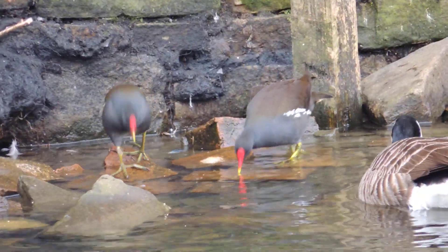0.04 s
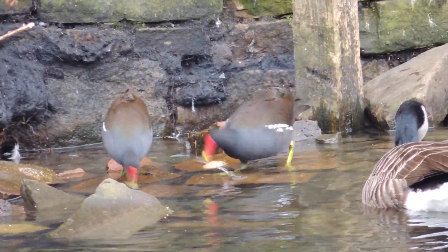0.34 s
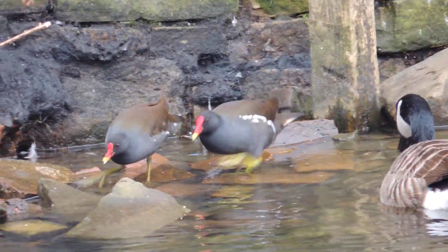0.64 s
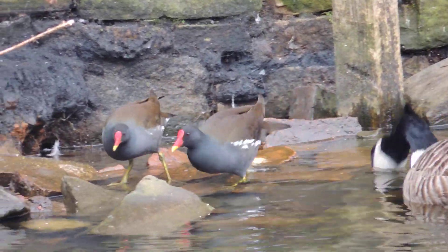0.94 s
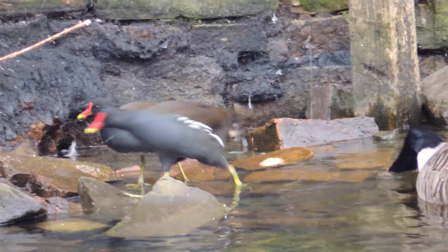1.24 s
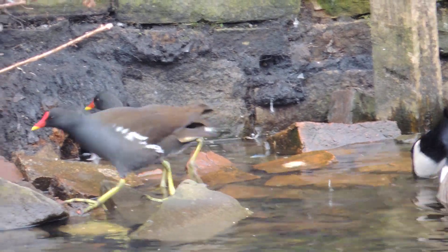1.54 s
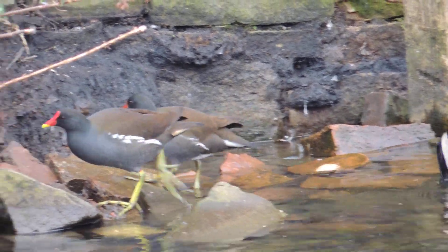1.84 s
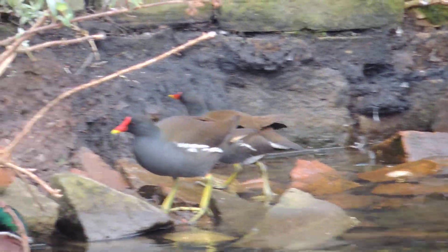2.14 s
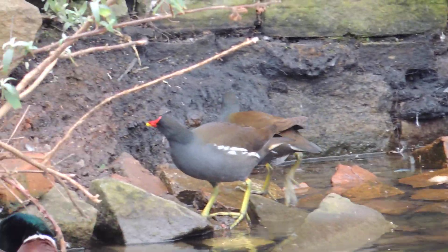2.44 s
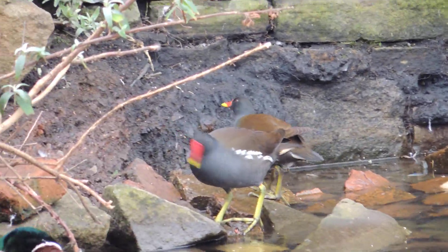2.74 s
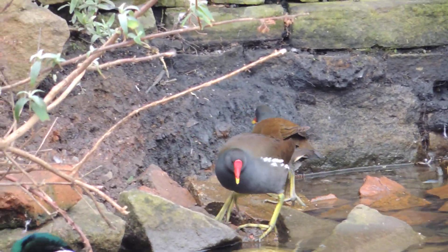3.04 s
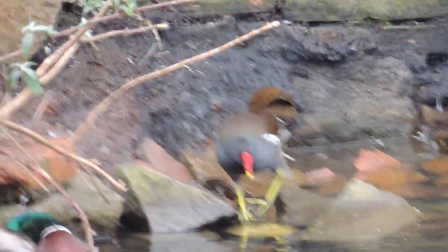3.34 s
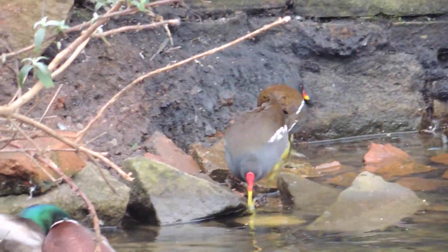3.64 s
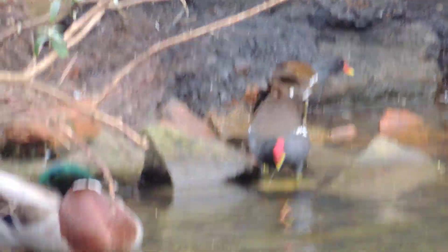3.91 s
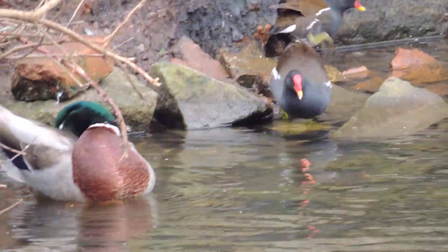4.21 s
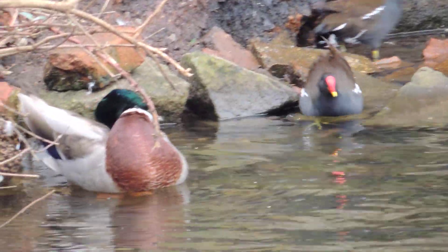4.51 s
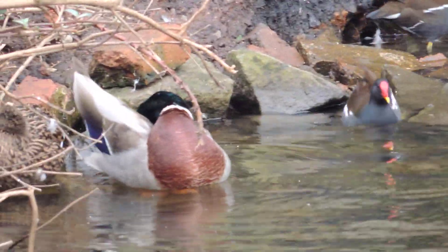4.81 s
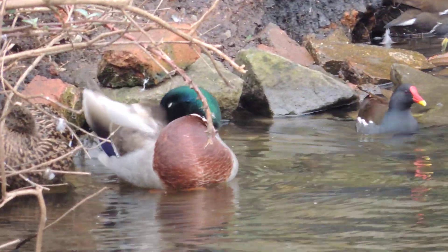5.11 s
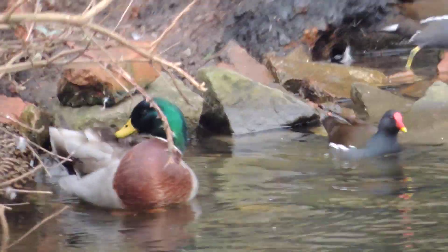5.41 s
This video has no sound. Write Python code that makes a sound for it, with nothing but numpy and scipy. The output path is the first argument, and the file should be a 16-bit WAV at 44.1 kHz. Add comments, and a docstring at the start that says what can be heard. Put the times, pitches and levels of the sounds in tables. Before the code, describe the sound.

A steady rush of water, slightly to the left, runs through the whole five and a half seconds outdoors. Wind rumbles on the microphone, mostly on the right, with low thumping buffets that crowd the first second and peak at about 0.85 seconds. Lighter gusts return between 2.2 and 2.8 seconds and from 3.7 onward. A faint, distant engine drones low underneath and fades after 2 seconds. Birds wading in the shallows make small drips, ticks and soft swishes throughout, with clearer plips near 0.5, 1.7, 3, 4.2 and 5.2 seconds, and very faint puffs of hiss around 4 seconds. A small bird nearby, slightly left, gives scattered, very high, tiny chips, the loudest at about 2.9 seconds. From 4.6 to 5.4 seconds a farther bird whistles thin, faintly echoing notes, three high ones followed by three lower ones.

```python
"""Wading birds by a canal bank

Water rushes steadily off to the left, the sum of countless ringing bubbles, and a far engine drones.
Wind rumbles and buffets as its eddies pass the microphone ports, mostly the right one. A small bird
nearby gives very high chips; towards the end a farther one whistles thin notes. In the shallows, feet
and bills set small cavities ringing, among soft swishes and a few very faint puffs of hiss."""
import sys
import numpy as np
from scipy import signal
from scipy.fft import rfft, irfft
from scipy.io import wavfile

SR = 44100
rng = np.random.default_rng(int(sys.argv[2]) if len(sys.argv) > 2 else 0)


def wav_record(signal):
    """Record a signal, one row per channel, as 16-bit PCM in the file named by sys.argv[1]."""
    frames = np.transpose(np.atleast_2d(signal))
    bounded = np.clip(frames, -1, 1)
    # unit amplitude maps onto the largest positive 16-bit level
    quanta = np.round(bounded * 32767).astype(np.int16)
    wavfile.write(sys.argv[1], SR, quanta)


N = 249606
TIME = np.arange(N) / SR
FREQS = np.maximum(np.fft.rfftfreq(N, 1 / SR), 1)


def from_db(db):
    """Amplitude ratio of a level: a factor of ten for every 20 dB."""
    return 10 ** (np.asarray(db) / 20)


def rms_one(x):
    """Normalisation to unit mean power."""
    return x / np.sqrt(np.mean(x ** 2) + 1e-20)


def gain_of(points):
    """Frequency response through points (f/Hz, level/dB), interpolated in log frequency."""
    hz, db = np.transpose(points)
    return from_db(np.interp(np.log(FREQS), np.log(hz), db))


def colour(x, gain):
    """Linear filtering: the spectrum is multiplied by a frequency response."""
    return irfft(rfft(x) * gain, N)


def noise(points, channels=1):
    """Incoherent Gaussian noises with a spectrum given as (f/Hz, spectral density level/dB)."""
    return colour(rng.standard_normal((channels, N)) * np.sqrt(SR / 2), gain_of(points))


def drift(corner_hz, channels=1):
    """Random fluctuation: low-pass noise of rms 1."""
    return rms_one(colour(rng.standard_normal((channels, N)), 1 / (1 + (FREQS / corner_hz) ** 2)))


def ring(x, hz, t60):
    """Damped resonator: a unit impulse starts a unit sine that falls 60 dB in t60 seconds."""
    r, w = from_db(-60 / (t60 * SR)), 2 * np.pi * hz / SR
    return signal.lfilter([0, np.sin(w)], [1, -2 * r * np.cos(w), r * r], x + 1e-18)


def add(out, s, sound, pan_db):
    """Superposition at time s; pan_db is left minus right, made by attenuating the weaker side."""
    start = round(s * SR)
    first, last = max(start, 0), min(start + len(sound), N)
    sides = from_db([[min(pan_db, 0)], [min(-pan_db, 0)]])
    out[:, first:last] += sides * sound[first - start:last - start]


def from_left(x, lag_ms):
    """Path difference: sound from the left reaches the right port later."""
    return np.array([x[0], colour(x[1], np.exp(-2j * np.pi * FREQS * lag_ms / 1000))])


def among_banks(x, t60, wet_db, delay_s):
    """Reverberation: walls and branches scatter sound into an exponential tail, different on each side."""
    t = TIME[:SR]
    tail = rng.standard_normal((2, SR)) * from_db(-60 * t / t60) * (t > delay_s)
    tail /= np.sqrt(np.sum(tail ** 2, axis=1, keepdims=True))
    return x + from_db(wet_db) * signal.fftconvolve(x, tail, axes=1)[:, :N]


def engine(level_db=-41.5, fades_at_s=2.1, fade_db_per_s=3.5, flutter_db=3, waver=0.022):
    """Long-range propagation: only the firing tone carries this far, and moving air makes it flutter."""
    # firing rate: t/s, f/Hz
    firing = [(0, 83.3), (.8, 76.14), (1.4, 84.75), (1.8, 60.9), (2.1, 60.64), (2.6, 66.55), (3.55, 66.1),
              (3.85, 45.9)]
    firing_hz = np.interp(TIME, *np.transpose(firing)) * (1 + waver * drift(5.9)[0])
    db = level_db - fade_db_per_s * np.maximum(TIME - fades_at_s, 0)
    return from_db(db + flutter_db * drift(30)[0]) * np.sin(2 * np.pi * np.cumsum(firing_hz) / SR)


def pings(samples, pitches, per_s, cycles, spread_db, max_spreads):
    """Free decay: random impulses ring down 60 dB in the given cycles; one signal for each pitch."""
    excess_db = spread_db * np.minimum(rng.exponential(1, samples), max_spreads)
    strengths = from_db(excess_db) * rng.choice([-1, 1], samples)
    born = rng.random(samples) < per_s / SR
    pitch_index = rng.integers(0, len(pitches), samples)
    return np.array([ring(strengths * born * (pitch_index == k), hz, cycles / hz)
                     for k, hz in enumerate(pitches)])


def rushing_water(bubble_db=-47, surge_db=0.97):
    """Incoherent summation: countless far bubbles merge into noise; nearer ones stand out a little."""
    # spectrum of the rush: f/Hz, spectral density level/dB
    spectrum = [(60, -65), (280, -66.5), (500, -70.5), (680, -68), (1000, -69.5), (1400, -69), (1900, -70),
                (2250, -73.7), (2800, -74.2), (3900, -80), (6000, -77.2), (7900, -77.5), (10300, -82.5),
                (12400, -82.5), (14200, -86.5)]
    # share of the hiss that differs between left and right, with narrow dips near 3.5 and 4.75 kHz:
    # f/Hz, level/dB re the whole (capped at 0 dB)
    unshared = [(100, -5), (300, -19.5), (600, -13.5), (1000, -6), (1350, -15.5), (2050, -4), (2800, -3),
                (3500, -23.5), (4100, 2), (4750, -20), (5400, -5), (6500, -4.5), (8000, -6), (10000, -1.5),
                (11200, -4), (14000, -4)]
    # diffraction round the housing puts the left port ahead: f/Hz, phase lead/rad
    port_lead = [(0, 0), (1890, 1.7854), (2500, 3), (3700, 3), (5000, 3.5), (5400, 5), (5860, 4), (6630, 7),
                 (7240, 6.5), (8530, 7.5), (11900, 8), (12500, 10.5), (14300, 10.5)]
    unshared_gain = np.minimum(gain_of(unshared), 1)
    common = colour(noise(spectrum)[0], np.sqrt(1 - unshared_gain ** 2))
    surge = from_db(surge_db * drift(28)[0])
    pitches = np.geomspace(450, 5000, 24)
    bubbles = pings(N, pitches, per_s=260, cycles=6.5, spread_db=1.5, max_spreads=5)
    nearer = rms_one(pitches ** -.25 @ bubbles)  # higher bubbles are weaker
    left = common * surge + from_db(bubble_db) * nearer
    right = colour(left, np.exp(-1j * np.interp(FREQS, *np.transpose(port_lead))))
    return np.array([left, right]) + colour(noise(spectrum, channels=2), unshared_gain)


def port_colour(x):
    """Frequency response of the two ports: each takes half of the level difference between them."""
    # left port relative to right: f/Hz, level/dB
    imbalance = [(250, -1), (700, -2), (2000, -1.7), (2900, 1), (5600, -1.5), (6300, 0), (6950, 1),
                 (8100, 4.5), (8800, 4.5), (10100, 9), (12500, 4.5), (13700, 4.5)]
    return colour(x, gain_of(imbalance) ** np.array([[.5], [-.5]]))


def waver_treble(x, corner_hz=5000):
    """Amplitude modulation of the upper band: the hiss slowly swells and sinks."""
    # gain of the treble: t/s, level/dB
    treble_level = [(0, -0.5), (.3, -2), (.6, -0.14), (1.3, 0.5), (1.7, -0.1), (2.2, .1), (3.5, 0.5),
                    (3.7, -0.62), (5.6, -0.39)]
    treble = colour(x, FREQS ** 2 / (FREQS ** 2 + corner_hz ** 2))
    return x + treble * (from_db(np.interp(TIME, *np.transpose(treble_level))) - 1)


def gusting():
    """Unsteady flow: the wind's level in dB above the breeze, as each gust swells, holds and drops."""
    # gusts: centre t/s, duration/s, level/dB re the breeze
    gusts = [(.12, 0.36, 8), (.42, 0.22, 7.5), (0.623, 0.17, 9.5), (0.94, .36, 7), (1.387, 0.21, 4),
             (2.225, 0.24, 6), (2.44, 0.28, 6), (2.621, 0.097, 5), (3.708, 0.18, 5.5), (3.914, 0.3, 5),
             (4.317, 0.18, 5.5), (4.524, 0.34, 4), (5.053, .24, 4), (5.5, 0.14, 3.5)]
    return sum(db * np.exp(-((TIME - s) / (length / 2)) ** 4) for s, length, db in gusts)


def wind(left_db=-44.5, right_db=-36.5, left_gust_share=0.93, lumps_db=2):
    """Turbulent pressure: each port has its own rumble under the same gusts; the left is sheltered."""
    # spectrum of the turbulence: f/Hz, relative spectral density level/dB
    rumble = [(12, -4), (25, 2), (45, 5), (80, 1.5), (130, -4.5), (220, -15.5), (400, -13), (900, -92)]
    gust_db = gusting()
    port_db = np.array([left_db + left_gust_share * gust_db, right_db + gust_db])
    port_db += lumps_db * drift(5.8, channels=2)
    return rms_one(noise(rumble, channels=2)) * from_db(port_db)


def eddies(per_s=4.5, peak_db=-30, spread_db=0.5, breeze_hz=69.6, octaves_per_db=.1, candidates=120):
    """Convection: faster air brings random lesser eddies more often, stronger and higher in pitch."""
    gust_db, duration, rows = gusting(), N / SR, []
    left_share, shadow_db = .2, 27  # an eddy hits one port and leaks faintly to the other
    for (when, chance, side), size in zip(rng.random((candidates, 3)), rng.standard_normal(candidates)):
        gust = gust_db[int(when * N)]
        if chance < per_s * from_db(gust) * duration / candidates:
            hz = breeze_hz * 2 ** (octaves_per_db * gust)
            pan_db = shadow_db if side < left_share else -shadow_db
            rows.append((when * duration, peak_db + gust - spread_db * size, hz, pan_db))
    return rows


def buffets(wake_db=-18, wake_s=0.017):
    """Vortex passage: a brief suction between two pressure lobes, wrapped in a turbulent wake."""
    # the hardest eddies: t/s, peak level/dB, f/Hz, left minus right/dB
    hard_eddies = [(.028, -18.5, 175, 22), (.075, -14, 174, -25), (.122, -16, 248, -18),
                   (.135, -11.5, 130, -20), (.164, -13, 115, -20), (.208, -16.5, 100, -25),
                   (0.284, -13.5, 226, -23), (.313, -18, 186, 7), (0.353, -21, 218, -6),
                   (.375, -13, 209, -20), (.392, -13, 135, -23), (.409, -21, 133, 12),
                   (0.495, -18, 173, -20), (.521, -18.5, 175, -24), (0.576, -23, 85, -18),
                   (0.612, -17.5, 85, -20), (.684, -11.5, 153, -26), (.707, -15.5, 125, -23),
                   (.782, -21.5, 149, -20), (.81, -19, 270, -22), (.85, -7.5, 165, -23),
                   (.865, -13.5, 80, -18), (0.878, -12, 100, -20), (.995, -19.5, 135, -23.5),
                   (1.115, -23, 54.7, -20), (1.372, -20, 210, -12), (1.392, -21, 110, -19),
                   (1.889, -22, 68, -22), (2.16, -15, 109, -26), (2.178, -22, 88, -22),
                   (2.458, -22.5, 89, -20), (2.622, -22, 80, -20), (2.801, -17, 172, -18),
                   (3.675, -24, 132, -20), (3.692, -19, 44.7, -25), (3.901, -20, 100, -23),
                   (3.977, -18.5, 70, -27), (4.098, -21, 124, -24), (4.237, -22, 100, -20),
                   (4.27, -17, 114, -24), (4.308, -23, 133, -20), (4.568, -21, 133, -22),
                   (5.08, -16, 80.4, -25)]
    out, t = np.zeros((2, N)), np.arange(-SR // 20, SR // 20) / SR
    for s, db, hz, pan_db in hard_eddies + eddies():
        distance_squared = (np.pi * hz * t) ** 2
        pulse = (2 * distance_squared - 1) * np.exp(-distance_squared)
        band = signal.butter(2, [hz / 2, hz * np.sqrt(2)], "band", fs=SR, output="sos")
        turbulence = rms_one(signal.sosfilt(band, rng.standard_normal(len(t))))
        wake = turbulence * np.exp(-.5 * (t / wake_s) ** 2)
        add(out, s + t[0], from_db(db) * (pulse + from_db(wake_db) * wake), pan_db)
    return out


def bird(notes, waver, waver_hz, skew, trill_hz, trill_db):
    """Frequency and amplitude modulation: each note is a gliding, trilled sine; skew > 1 peaks late."""
    out, unsteady = np.zeros((2, N)), drift(waver_hz)[0]
    for s, length, pitch_hz, db, fall, pan_db in notes:
        progress = np.linspace(0, 1, max(round(length * SR), 20))
        rasp = waver * np.interp(s + progress * length, TIME, unsteady)
        hz = pitch_hz * (1 + fall * (.5 - progress) + rasp)
        swell = np.sqrt(np.abs(np.sin(np.pi * progress ** skew)))
        dips_db = trill_db * np.cos(np.pi * trill_hz * progress * length) ** 2
        add(out, s, from_db(db - dips_db) * swell * np.sin(2 * np.pi * np.cumsum(hz) / SR), pan_db)
    return out


def far_bird():
    """Nearly pure tones: slight modulation leaves the whistles thin and narrow in band."""
    # whistles: t/s, duration/s, f/Hz, level/dB before the trill, fall/share of f, left minus right/dB
    whistles = [(4.625, 0.051, 7190, -37, -0.0033, -15), (4.675, .07, 7225, -34, -0.0026, -15),
                (4.75, .07, 7160, -42, 0.0032, -10), (5.042, .06, 4010, -35.5, 0.021, -13),
                (5.145, 0.066, 3100, -40, -0.028, 4), (5.27, 0.092, 3080, -40, 0.022, 6)]
    return bird(whistles, waver=0.0028, waver_hz=120, skew=0.53, trill_hz=22.1, trill_db=4)


def near_bird():
    """Spectral broadening: short duration and fast pitch jitter turn high tones into chips."""
    # chips: t/s, duration/s, f/Hz, level/dB before the trill, fall/share of f, left minus right/dB
    chips = [(.482, .008, 9600, -33, .06, 6), (.81, .007, 11400, -29, .02, 8),
             (1.509, .0083, 11600, -25, .03, 8), (2.123, 0.019, 9750, -30, 0.041, 8),
             (2.563, 0.013, 9430, -27, .02, 6), (2.874, 0.016, 9520, -13.5, .04, 9),
             (3.254, 0.0084, 9300, -22, 0.082, 5), (3.561, 0.04, 9400, -29, 0.048, 15),
             (3.603, .009, 9600, -24, .02, 10), (3.61, .007, 10900, -29, .02, 6),
             (4.262, 0.016, 10000, -30, .02, 8), (4.295, .018, 9450, -33, .02, 8),
             (4.316, .006, 9900, -29, -.15, 8), (4.677, .0053, 9550, -27, .03, 8)]
    return bird(chips, waver=0.033, waver_hz=2400, skew=1.7, trill_hz=114, trill_db=12)


def swishes(octaves=0.2):
    """Overlapping resonances: a dense cloud of tiny pings merges into a hiss that swells and ebbs."""
    # swishes; those at 3.855, 4.05 and 4.417 s are very faint brief puffs of hiss near 3.6 kHz:
    # centre t/s, duration/s, level/dB, centre f/Hz, left minus right/dB
    puffs = [(0.593, 0.033, -44.5, 4200, -7), (.668, 0.033, -45, 4200, -1), (.95, 0.045, -49, 4480, 4),
             (1.05, .03, -45, 3900, -4.5), (1.611, 0.058, -42.5, 3460, -9), (1.74, .1, -45.5, 4200, -8),
             (1.968, 0.36, -51, 4540, -5), (2.3, .08, -52, 3380, 4), (2.95, .05, -49, 3600, 2),
             (3.131, .09, -47, 3500, 3), (3.315, 0.076, -45, 3570, 2), (3.855, 0.033, -50, 3716, 1),
             (4.05, .04, -49.5, 3510, 3), (4.417, .04, -50, 3600, 0), (5.149, 0.046, -45, 4700, 7)]
    out, t = np.zeros((2, N)), np.arange(-SR // 4, SR // 4) / SR
    for s, length, db, hz, pan_db in puffs:
        pitches = hz * 2 ** (octaves * np.linspace(-1, 1, 9))
        ringing = pings(len(t), pitches, per_s=600, cycles=13, spread_db=3, max_spreads=4)
        swell = np.exp(-(2 * t / length) ** 2)
        add(out, s + t[0], from_db(db) * rms_one(sum(ringing)) * swell, pan_db)
    return out


def splashes_and_chip(tail_db=-32, tail_t60=0.11):
    """Impulse response: a click with a faint noisy tail rings a resonance, as a drip rings a cavity."""
    # drips and slaps in the water; the row at 3.969 s is a very high, short chip, slightly to the left:
    # t/s, peak level/dB, f/Hz, t60/s, left minus right/dB
    transients = [(.448, -27, 1020, 0.033, 1), (.505, -26.5, 980, .03, -1),
                  (.6036, -22.5, 4050, 0.0035, -22), (.666, -38, 4300, .003, 4), (.825, -39, 2750, .003, 7),
                  (0.954, -29, 4500, .002, -4), (1.0555, -23, 3750, 0.0014, -11),
                  (1.388, -27, 705, .07, -4), (1.459, -25, 6000, .0015, -3),
                  (1.6127, -23, 3250, 0.0022, -11), (1.626, -23, 5900, .0015, -5),
                  (1.723, -23, 4440, .0015, -10), (1.724, -23, 740, 0.013, -4),
                  (1.742, -28, 5900, .002, -5), (1.821, -29, 3000, 0.0012, -9),
                  (1.9968, -25, 3500, 0.0015, -9), (2.9874, -17.5, 1050, 0.0044, 0),
                  (3.2135, -28, 3450, 0.00098, -4), (3.3194, -25, 7200, .0015, 0),
                  (3.3477, -33, 2900, .002, 4), (3.969, -22, 8700, 0.0028, 6), (4.2041, -21, 1120, .006, 0),
                  (4.727, -26, 6820, .003, -1), (5.2117, -21.5, 1380, 0.0088, -2)]
    out, t = np.zeros((2, N)), np.arange(SR // 10) / SR
    for s, db, hz, t60, pan_db in transients:
        tail = rng.standard_normal(len(t)) * from_db(tail_db - 60 * t / tail_t60)
        ringing = ring((t == 0) + tail, hz, t60)
        add(out, s, from_db(db) * ringing / np.abs(ringing).max(), pan_db)
    return out


def scene():
    """Superposition at the two ports of water, wind, engine, wading and bird calls."""
    rush = waver_treble(port_colour(rushing_water()))
    shallows = among_banks(splashes_and_chip() + swishes(), t60=.16, wet_db=-6, delay_s=.01)
    chips, whistles = near_bird(), far_bird()
    near = among_banks(from_left(chips, lag_ms=.13), t60=.13, wet_db=-15, delay_s=.006)
    far = among_banks(from_left(whistles, lag_ms=.12), t60=.6, wet_db=-3, delay_s=.008)
    return rush + wind() + engine() + buffets() + shallows + near + far


def record(dry):
    """Band limiting: a steep elliptic low-pass removes the highest treble."""
    cutoff_hz = 14250
    return signal.sosfilt(signal.ellip(12, .1, 80, cutoff_hz, fs=SR, output="sos"), dry)


dry = scene()
out = record(dry)
wav_record(out)
```